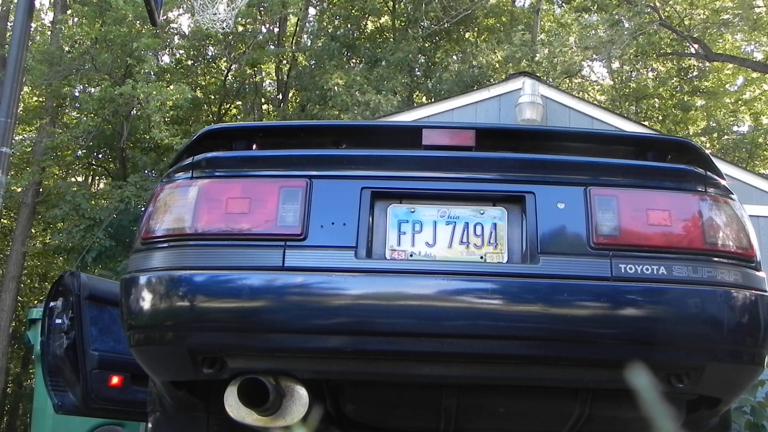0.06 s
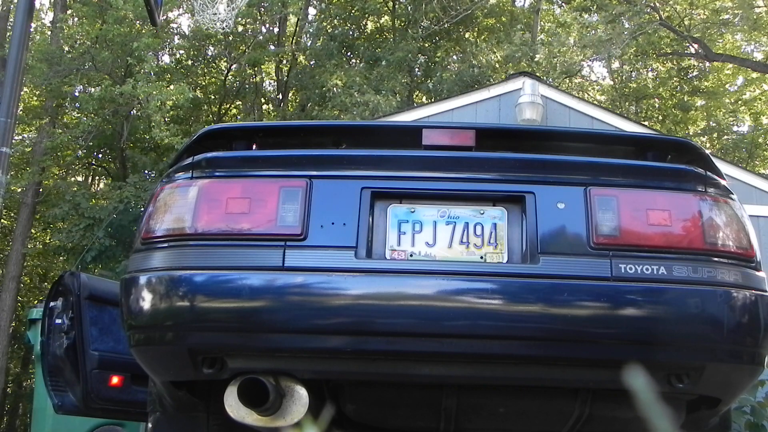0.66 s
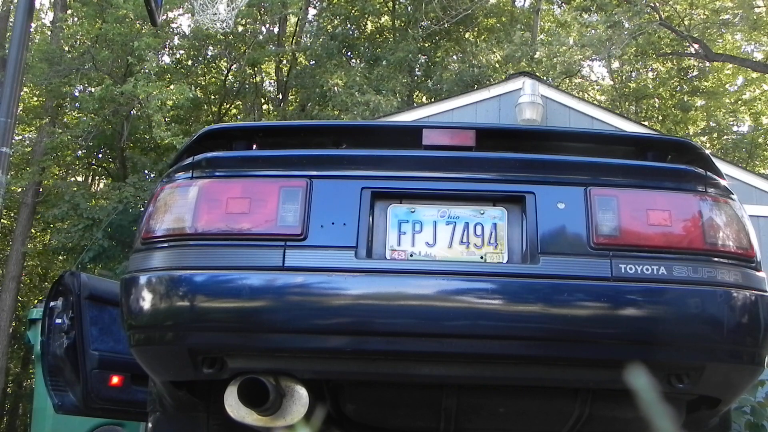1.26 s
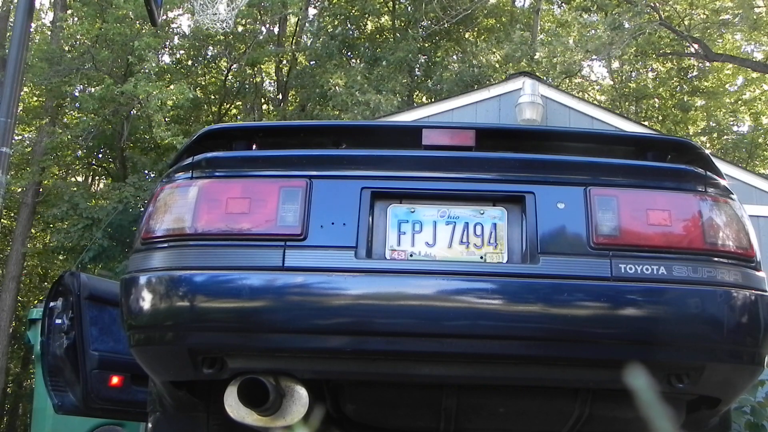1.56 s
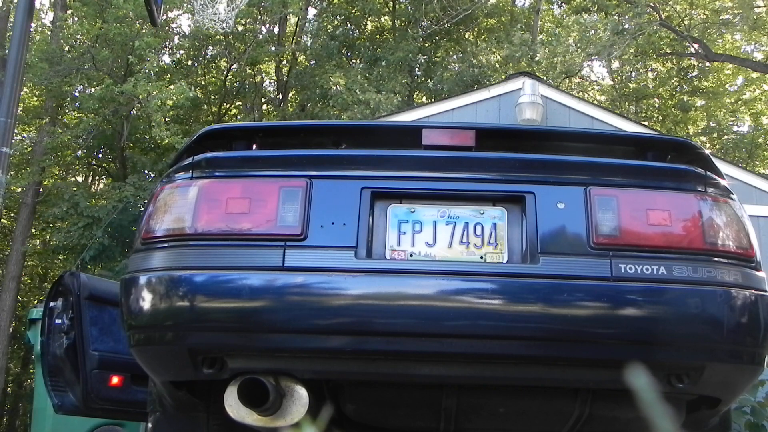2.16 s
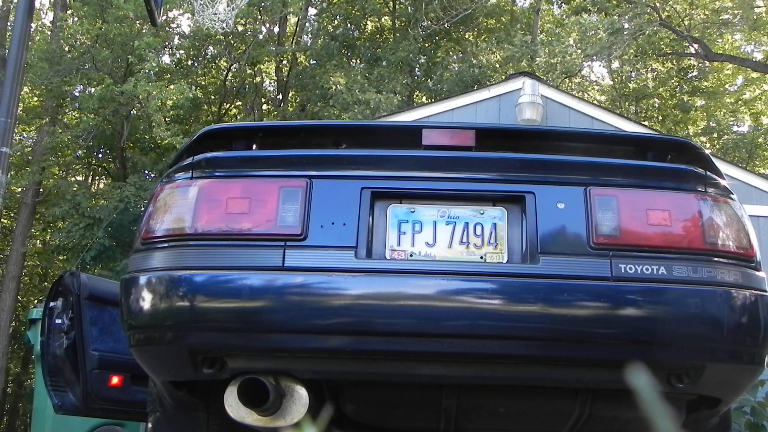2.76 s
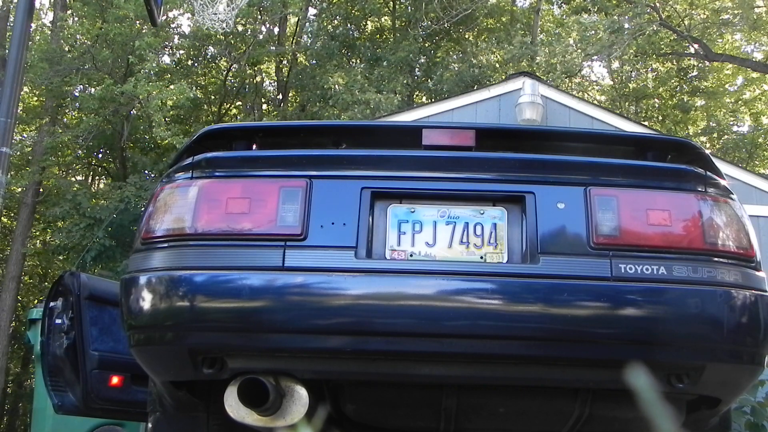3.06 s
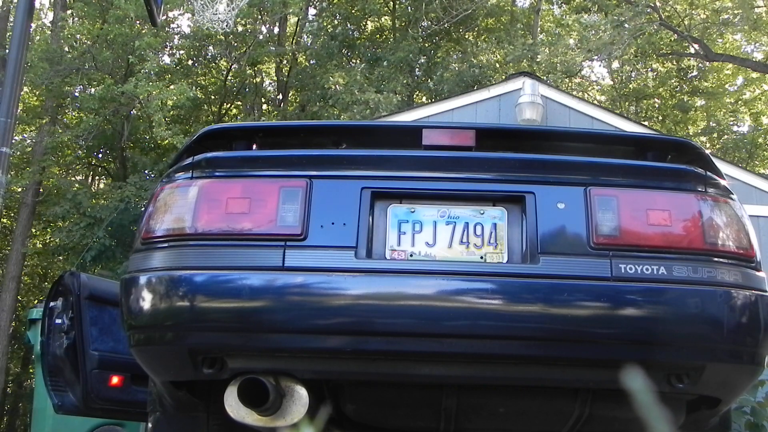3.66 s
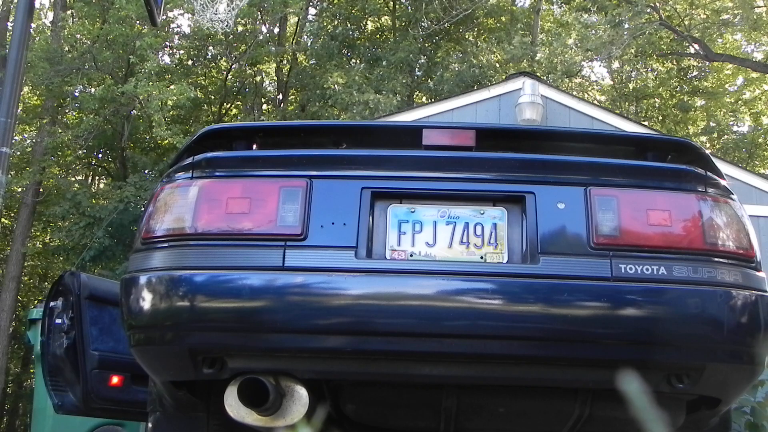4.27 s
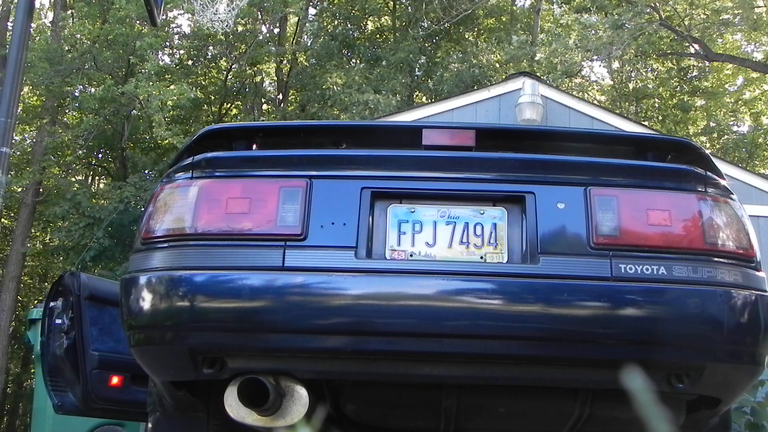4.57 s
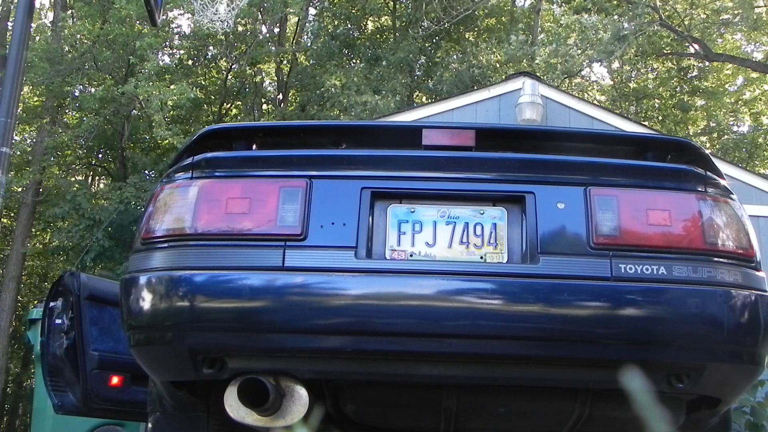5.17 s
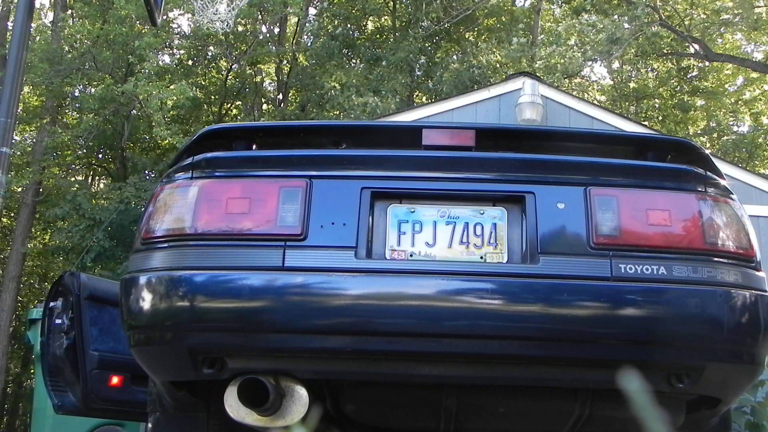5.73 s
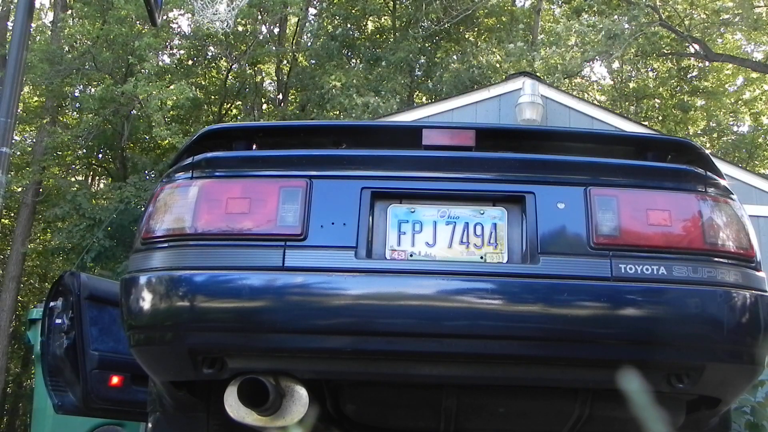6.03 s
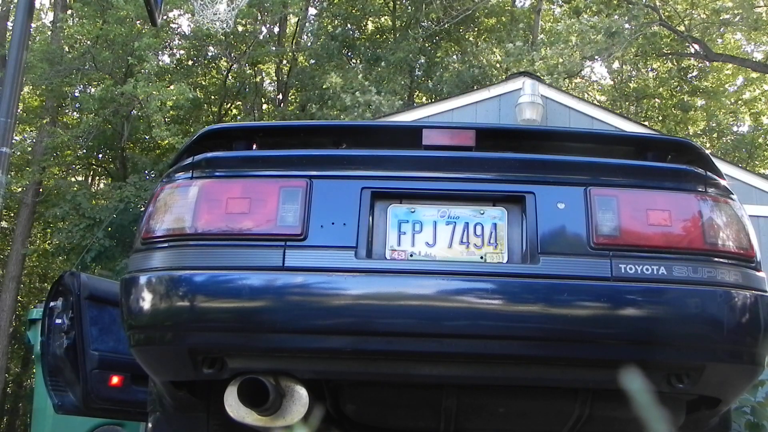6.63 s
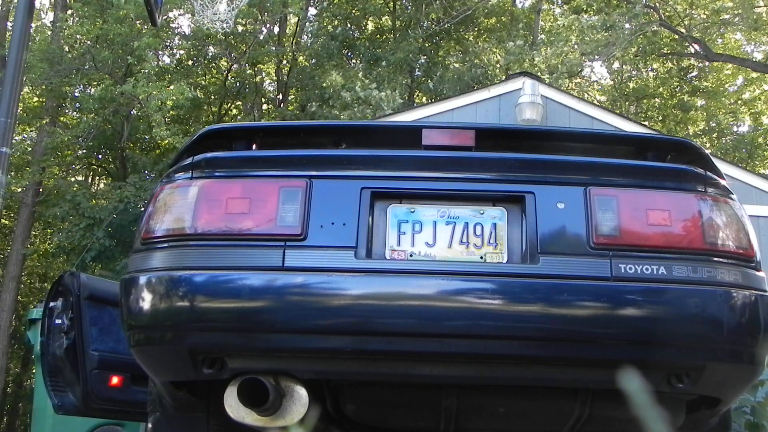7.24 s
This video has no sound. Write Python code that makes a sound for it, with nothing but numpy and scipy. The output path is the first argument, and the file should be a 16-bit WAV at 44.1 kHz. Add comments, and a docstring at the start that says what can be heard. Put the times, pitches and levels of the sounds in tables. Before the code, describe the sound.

Close behind a tailpipe outdoors, a turbocharged engine goes from a low idle into three rising, booming revs with faint hiss and clicks.

```python
"""Six-cylinder car, idling and revved

Heard outdoors from just behind the tailpipe, the engine idles and is revved three times. Each firing
is a pressure pulse that excites resonances: a thump in the muffler, a bark in the pipe. On the overrun
uneven burns lope and pop. Farther off to the right the engine bay whirs and hisses, and boost escapes
in a whoosh after each lift. Faint dry clicks crackle on the bass thumps as a rev begins."""
import sys
import numpy as np
from scipy import signal
from scipy.fft import rfft, irfft, next_fast_len
from scipy.io import wavfile
from scipy.ndimage import uniform_filter1d, minimum_filter1d, map_coordinates

SR = 44100
rng = np.random.default_rng(int(sys.argv[2]) if len(sys.argv) > 2 else 0)


def put_to_file(sound):
    """Save the sound as 16-bit audio at rate SR, in the file named by the first command-line argument."""
    columns = np.atleast_2d(sound).T  # one column per channel
    safe = np.clip(columns, -1, 1)
    whole_steps = np.round(safe * 32767)
    wavfile.write(sys.argv[1], SR, whole_steps.astype(np.int16))


N = 330750

# engine speed: t/s, firing rate/Hz
FIRING_RATE = [(0.0, 35.5), (0.81, 35.87), (0.98, 38.48), (1.0, 39), (1.15, 64.4), (1.23, 80.36),
               (1.33, 99.7), (1.46, 122.4), (1.52, 128.6), (1.84, 106.5), (2.19, 82.45), (2.59, 59.44),
               (2.8, 48.52), (3.34, 40.6), (3.59, 40.8), (3.7, 43.9), (3.78, 51.5), (3.91, 76.8),
               (3.97, 90.16), (4.07, 109.9), (4.26, 148.6), (4.41, 177.4), (4.58, 200.9), (4.78, 185.2),
               (5.35, 138.6), (5.91, 98.6), (6.14, 115), (6.43, 158.4), (6.73, 209.7), (7.02, 266),
               (7.16, 284.5), (7.5, 250.7)]
# throttle presses: opens/s, closes/s, blow-off rasp/dB, whoosh/dB, lift to whoosh peak/s
PRESSES = [(0.979, 1.518, -43, -63.5, 0.13), (3.643, 4.57, -35, -51, .28), (5.924, 7.176, -37.5, -43, .14)]
# cylinders in firing order, at full imbalance: excess strength/1, lag/firing intervals
FIRING_ORDER = [(0.7,0.091),(-0.34,0.029),(0.089,-0.16),(0.79,0.048),(0.39,-0.014),(-.6,-0.26)]
# engine stumbles: t/s, drop in the boom/dB, half-length/s
DROPOUTS = [(0.114, 6, 0.016), (0.192, 10.5, 0.016), (1.526, 4.5, 0.07), (2.882, 7, 0.045), (3.207, 8, .04),
            (3.5, 6, 0.18), (4.322, 1, 0.045), (4.567, 6, 0.05), (5.906, 8, .026), (6.409, 1, 0.034),
            (6.685, 2, 0.034), (7.184, 5.5, 0.031)]
# exhaust responses to even firings, their irregularities, pulse fronts and load: f/Hz, gain/dB
MUFFLER_GAIN = [(20,-59.5),(36,-17.5),(44,-7),(52,5.5),(72,3.5),(108,9.5),(142,6.5),(178,-6),(215,-11.5),(245,-20),(285,-26),(330,-40.5),(500,-71.5),(1200,-105),(5000,-165)]
LOPE_GAIN = [(30,-47.5),(50,-15),(72,4.5),(100,0.5),(135,9),(170,-1),(230,-12),(300,-26),(600,-67),(4000,-160)]
PIPE_GAIN = [(40,-75.5),(130,-29),(225,1.5),(310,-3.5),(390,3),(480,0),(560,-3),(680,-4.5),(800,-12.5),(1000,-19),(1600,-22.5),(2500,-46.5),(8000,-86)]
CRACK_GAIN = [(300,-56),(650,-8.5),(850,-3),(1100,-2.5),(1600,-4.5),(2200,-21.5),(3200,-28),(7000,-80)]
# base levels of exhaust bark and engine bay whir: firing rate/Hz, level/dB
BARK_BY_RATE = [(35, -33), (48, -35), (100, -31), (150, -29), (195, -25), (235, -22.5), (290, -27)]
WHIR_BY_RATE = [(35, -37.5), (43, -38.5), (56, -42), (80, -39.5), (135, -38.5), (195, -32.5), (290, -30)]
# noise of outflow, machinery, intake (hiss, top fizz), turbo and blow-off: f/Hz, level/dB
BUFFET_SPECTRUM = [(15, -7), (30, -2.5), (60, -2.5), (120, -15), (400, -59.5)]
WHIR_SPECTRUM = [(400,-40.5),(700,2),(900,0.5),(1200,0),(1600,-1),(2400,-5.5),(3200,-10),(3800,-14.5),(4200,-22.5),(6000,-32.5),(10000,-87)]
HISS_SPECTRUM = [(2500,-23),(3850,1),(4400,-2),(4650,0),(4950,-2),(5260,-2),(5950,-4.5),(6350,-4),(7500,-6.5),(7730,-5.5),(8150,-8.5),(8600,-10),(9500,-12.5),(12500,-40)]
FIZZ_SPECTRUM = [(6000,-24.5),(9000,0.5),(11000,1),(13000,-3.5),(15500,3.5)]
TURBO_SPECTRUM = [(3000,-30.5),(4200,-4),(5500,-1.5),(6300,3.5),(7000,-3.5),(7450,-2.5),(8500,-7.5),(9500,-14),(12000,-45)]
RASP_SPECTRUM = [(600, -24.5), (1400, -4), (2300, -1), (3400, -10), (4500, -18), (8000, -44.5)]
# the clearest dry clicks: t/s, level before filtering/dB
CLICK_EVENTS = [(0.5666, -37.5), (0.9502, -37.5), (1.0028, -37), (1.0497, -38), (1.1065, -42), (1.14, -38),
                (1.1982, -38), (3.6626, -38), (3.7079, -41), (3.7494, -37), (3.7918, -35.5),
                (3.8385, -32.5), (3.8844, -42), (4.79, -37.5), (5.031, -39), (5.3073, -34.5),
                (6.0114, -38.5), (6.3246, -38)]
# colour of a click: f/Hz, gain/dB
CLICK_GAIN = [(2000,-23.5),(5000,-9.5),(9000,6.5),(15000,3.5)]
# extra-strong burns: t/s, pulse level/dB
STRONG_BURNS = [(1.55,-12.5),(2.96,-11),(3.092,-16.5),(3.136,-16.5),(3.277,-17),(3.663,-20.5),(4.612,-6),(7.422,-11.5),(7.434,-17),(7.459,-6.5)]
# left-right likeness of airy sounds: f/Hz, coherence/1
COHERENCE = [(200,0.78),(400,0.82),(700,0.61),(1400,0.12),(2800,.55),(5500,0.31),(10000,.4),(14000,0.38)]
# microphone pair: f/Hz, left minus right level/dB, phase lead of the left/rad
MIC_DIFFERENCES = [(60,.9,-.22),(110,.5,-.22),(200,.4,-.36),(380,-2.2,-1.15),(700,-6,-1.3),(1300,-9,-2.7),(2300,-8.5,-4.2),(4400,-3.5,-5),(8000,-.7,-5.8),(15000,.6,-6.2)]

PEDAL_S, SETTLE_S = 0.064, 0.18  # lag of the throttle; further lag of the ducking and the gulp's decay
IDLE_HZ, IDLE_WIDTH_HZ = 49, 3  # below this firing rate the idle valve feeds the engine
LABOUR_HZ, LABOUR_WIDTH_HZ = 74, 39.5  # where an open throttle strains the engine most
HUNT_HZ, HUNT_WIDTH_HZ, HUNT_SCATTER = 43.9, 5, .17  # ragged burns as the engine hunts for its idle
IMBALANCE, SCATTER = (.04, 0.21, 0.025), (.035, 0.05, 0.14)  # base, extra on overrun, extra at idle
BOOM_DB, BOOM_HZ, ABOVE_DB_PER_OCT, BELOW_DB_PER_OCT = -10, 130.4, 13.5, 4
STEEPNESS_S, STEEPNESS_LOAD_S, FULL_PULL_HZ = .00022, 0.0012, 100
BARK_LABOUR_DB, BARK_GULP_DB, CRACK_DB = 5, 2.5, -6.5
BUFFET_DB, BUFFET_FADES_HZ = -43.5, 145
INTAKE_DB, FIZZ_DB = (-57.5, 6, 3), (-64.5, 4.5, 17.5)  # coasting, gain at idle, depth of ducking
TURBO_DB, TURBO_HZ, TURBO_DB_PER_OCT = -49.5, 280, 21
DIP_HZ, DIP_WIDTH_HZ, DIP_DB = 137, 17, 3  # the treble dips as the engine pulls through this rate
TOP_HZ = 15850


def amp(db):
    """Amplitude ratio of a level in decibels."""
    return 10 ** (np.asarray(db) / 20)


def unit(x):
    """Normalisation to rms 1."""
    return x / np.sqrt(np.mean(x ** 2) + 1e-20)


def along(points, hz):
    """Interpolation on a logarithmic frequency axis."""
    f, values = np.transpose(points)
    return np.interp(np.log(hz + 1), np.log(f + 1), values)


def wobble(rate):
    """Random modulation: a spline with rate knots a second."""
    return map_coordinates(rng.standard_normal(int(N * rate / SR) + 4), [np.arange(N) * rate / SR])


def lagged(x, seconds):
    """First-order relaxation towards x."""
    keep = np.exp(-1 / (seconds * SR))
    return signal.lfilter([1 - keep], [1, -keep], x)


def filtered(x, response):
    """Linear filtering: the spectrum times a frequency response."""
    size = 2 * next_fast_len((N + SR // 2) // 2)
    return irfft(rfft(x, size) * response(np.fft.rfftfreq(size, 1 / SR)), size)[..., :N]


def ring(x, colour, abrupt=1):
    """Resonance: at abrupt 1 (minimum phase) ringing follows each push; at less it also swells into it."""
    def response(hz):
        cepstrum = irfft(np.log(amp(along(colour, hz))))
        half = len(cepstrum) // 2
        cepstrum[1:half] *= 2
        cepstrum[half + 1:] = 0
        log_gain = rfft(cepstrum)
        return np.exp(log_gain.real + 1j * abrupt * log_gain.imag)
    return filtered(x, response)


def steady(x):
    """Running normalisation to rms 1 over an eighth of a second."""
    window = np.hanning(SR // 8)
    weight = signal.fftconvolve(np.ones(N), window, "same")
    return x / np.sqrt(np.abs(signal.fftconvolve(x ** 2, window, "same")) / weight + 1e-20)


def pulses(at, sizes):
    """Impulse train at fractional sample positions."""
    at = np.clip(at, 0, N - 2)
    whole = at.astype(int)
    return np.bincount(whole, sizes * (1 - at + whole), N) + np.bincount(whole + 1, sizes * (at - whole), N)


def rush(colour):
    """Partial coherence: independent mid and side noises make stereo noise of rms 1."""
    def response(hz):
        angle = np.arccos(np.clip(along(COHERENCE, hz), -1, 1)) / 2
        return amp(along(colour, hz)) * [np.cos(angle), np.sin(angle)]
    mid, side = filtered(rng.standard_normal((2, N)), response)
    return unit(np.array([mid + side, mid - side]))


def driving():
    """Operating point: firing rate/Hz, then throttle, idling and labour, each 0-1."""
    t = np.arange(N) / SR
    rate = np.interp(t, *np.transpose(FIRING_RATE))
    pedal = sum(1. * ((t > opens) & (t < closes)) for opens, closes, *_ in PRESSES)
    throttle = lagged(pedal, PEDAL_S)
    idling = .5 - .5 * np.tanh((rate - IDLE_HZ) / IDLE_WIDTH_HZ)
    labour = throttle * np.exp(-((rate - LABOUR_HZ) / LABOUR_WIDTH_HZ) ** 2)
    return rate, throttle, idling, labour


def gulping(throttle):
    """Transient inflow just after the throttle opens, 0-1."""
    return throttle * (1 - lagged(throttle, SETTLE_S))


def combustion(drive):
    """Cyclic variation: fed burns are even and clean, starved ones ragged."""
    rate, throttle, idling, _ = drive
    state = [np.ones(N), (1 - throttle) * (1 - idling), idling]
    hunting = (1 - throttle) * np.exp(-((rate - HUNT_HZ) / HUNT_WIDTH_HZ) ** 2)
    imbalance = np.dot(IMBALANCE, state)
    scatter = np.dot(SCATTER, state) + HUNT_SCATTER * hunting
    turbulence = np.maximum(1 - 0.3 * throttle - 0.0026 * rate, .11)  # noisy share of the bark
    return np.clip([imbalance, scatter, turbulence], 0, 1)


def firings(cycles, drive):
    """Superposition: firing positions, an even pulse train, and what unequal burns add to it."""
    imbalance, scatter, _ = combustion(drive)
    number = np.arange(1, int(cycles[-1]))
    at = np.interp(number, cycles, np.arange(N))
    now = at.astype(int)
    chance = rng.standard_normal((len(at), 2))
    excess, lag = np.array(FIRING_ORDER)[number % len(FIRING_ORDER)].T
    # an odd burn also leaves the valve a little early or late
    late = (imbalance[now] * lag + 0.23 * scatter[now] * chance[:, 0]) * np.gradient(at)
    sizes = (1 + imbalance[now] * excess) * np.exp(scatter[now] * chance[:, 1])
    even = pulses(at, np.ones(len(at)))
    return at, even, pulses(at + late, sizes) - even


def muffler(even, uneven, drive):
    """Acoustic low-pass: the low orders boom, and the cylinders' differences lope between them."""
    rate, throttle, idling, _ = drive
    octaves = np.log2(rate / BOOM_HZ)
    above_db = ABOVE_DB_PER_OCT * np.maximum(octaves, 0)
    below_db = BELOW_DB_PER_OCT * np.maximum(-octaves, 0) * (1 - throttle)
    boom_db = BOOM_DB + 0.03 * throttle + 2.8 * idling - above_db - below_db - stumbles()
    boom = -ring(even, MUFFLER_GAIN, abrupt=0.83) - ring(uneven, LOPE_GAIN, abrupt=0.8)
    # load steepens each pulse, which lifts its overtones
    steepness_s = STEEPNESS_S + STEEPNESS_LOAD_S * throttle * np.minimum(rate / FULL_PULL_HZ, 1) ** 3
    return amp(boom_db) * steady(boom + steepness_s * SR * np.gradient(boom))


def tailpipe(at, cycles, drive):
    """Pipe resonance: each pulse front barks, cracks under load and drags a turbulent puff after it."""
    rate, throttle, _, labour = drive
    imbalance, _, turbulence = combustion(drive)
    bark_db = along(BARK_BY_RATE, rate) + 0.22 * throttle + BARK_LABOUR_DB * labour
    bark_db += BARK_GULP_DB * gulping(throttle) - .15 * stumbles()
    turbulence = turbulence * np.clip(1 - .4 * labour, 0, 1)
    excess, lag = np.array(FIRING_ORDER)[np.arange(1, len(at) + 1) % len(FIRING_ORDER)].T
    chance = rng.standard_normal((len(at), 2))
    sizes = 1 + (0.61 + 5.0 * np.interp(at, np.arange(N), imbalance)) * excess
    # unequal manifold runners shift the fronts, so lines sound between the firing orders
    arrival = at + 0.0015 * SR * lag
    bark = steady(-ring(pulses(arrival, sizes * amp(.9 * chance[:, 0])), PIPE_GAIN))
    puffs = unit(np.exp(0.081 * np.cos(2 * np.pi * (cycles - .15)))) * rush(PIPE_GAIN)
    crack = steady(-ring(pulses(arrival, amp(2.8 * chance[:, 1])), CRACK_GAIN))
    tone = np.sqrt(1 - turbulence) * bark + np.sqrt(turbulence) * puffs
    return amp(bark_db) * (tone + amp(CRACK_DB) * labour ** 2 * crack)


def buffeting(rate):
    """Unsteady outflow: gas rumbles out of the tailpipe and smooths out at high firing rates."""
    return amp(BUFFET_DB) / np.hypot(1, (rate / BUFFET_FADES_HZ) ** 5) * rush(BUFFET_SPECTRUM)


def whir(cycles, rate, ducking, labour):
    """Amplitude modulation: the noise of valve gear, belts and fan pulses with the shaft."""
    waver = amp(.6 * wobble(7))
    phase = 2 * np.pi * cycles
    clatter = amp(0.8 * np.cos(phase) + 0.36 * np.cos(phase / len(FIRING_ORDER)) + 0.99 * wobble(45))
    level_db = along(WHIR_BY_RATE, rate) - 3.6 * ducking + 1.4 * labour
    return amp(level_db) * waver * unit(clatter) * rush(WHIR_SPECTRUM)


def intake_gain(drive, ducking, coasting_db, idle_db, duck_db):
    """Envelope of flow noise: hiss and fizz duck while the throttle is open, then recover."""
    rate, throttle, idling, _ = drive
    bypass = idling * (rate.min() / rate) ** 2  # the idle valve opens wider the slower the engine turns
    return amp(coasting_db + idle_db * bypass - duck_db * ducking + 6 * gulping(throttle))


def engine_bay(cycles, drive):
    """Incoherent sources add in power: whir, intake, blow-off and a turbo that swells with speed."""
    rate, throttle, _, labour = drive
    ducking = lagged(throttle, SETTLE_S)  # 0-1, builds while the throttle is open and the exhaust booms
    machinery = whir(cycles, rate, ducking, labour)
    turbo = amp(TURBO_DB + TURBO_DB_PER_OCT * np.log2(rate / TURBO_HZ))
    rasp, whoosh = blow_off()
    flicker = amp(wobble(60))
    intake = intake_gain(drive, ducking, *INTAKE_DB) * rush(HISS_SPECTRUM)
    boost = np.hypot(turbo, whoosh) * rush(TURBO_SPECTRUM)
    front = underbody(machinery + flicker * (intake + boost) + rasp * rush(RASP_SPECTRUM), echo=0.14)
    fizz = intake_gain(drive, ducking, *FIZZ_DB) + amp(-15.5) * turbo + amp(-10.0) * whoosh
    dip = amp(-DIP_DB * ducking * np.exp(-((rate - DIP_HZ) / DIP_WIDTH_HZ) ** 2))
    return dip * (front + fizz * rush(FIZZ_SPECTRUM))


def underbody(x, echo, count=8):
    """Comb filtering: reflections between road and floor pan ripple the spectrum."""
    out = x.copy()
    for delay_s, strength in rng.uniform([.001, -echo], [.016, echo], (count, 2)):
        lag = round(delay_s * SR)
        out[:, lag:] += strength * x[:, :N - lag]
    return out * np.std(x) / np.std(out)


def stumbles():
    """Gaussian dips in level, in dB, where the engine stumbles."""
    t = np.arange(N) / SR
    return sum(db * np.exp(-((t - s) / half_s) ** 2) for s, db, half_s in DROPOUTS)


def clicks(drive):
    """Broadband transients: faint dry clicks, crackling on the loudest bass thumps as a rev begins."""
    rate, throttle, _, _ = drive
    clicks_per_s = 220 * throttle * np.clip((LABOUR_HZ - rate) / (LABOUR_HZ - IDLE_HZ), 0, 1)
    onsets = np.flatnonzero(rng.random(N) < clicks_per_s / SR)
    crackle = [(i / SR, rng.normal(-44, 3)) for i in onsets]
    out, t = np.zeros(N + SR), np.arange(SR // 100) / SR
    for s, db in list(CLICK_EVENTS) + crackle:
        burst = rng.standard_normal(len(t)) * amp(-60 * t / .004)
        out[round(s * SR):][:len(t)] += amp(db) * burst / np.abs(burst).max()
    return ring(out[:N], CLICK_GAIN)


def blow_off():
    """Pressure release: envelopes of a rasp, then a thinner whoosh, as boost escapes after each lift."""
    t = np.arange(N) / SR
    rasp, whoosh = np.zeros(N), np.zeros(N)
    swell = lambda age: (age * np.exp(1 - age)) ** 1.6
    for _, closes, rasp_db, whoosh_db, peak_s in PRESSES:
        age = np.maximum(t - closes, 0) / peak_s
        rasp += amp(rasp_db) * swell(1.55 * age)
        whoosh += amp(whoosh_db) * swell(age)
    return rasp, whoosh


def pops(at):
    """Impulse response: extra-strong burns ride on the nearest firing and thump muffler and pipe."""
    s, db = np.transpose(STRONG_BURNS)
    nearest = at[np.abs(at[:, None] - s * SR).argmin(axis=0)]
    pushes = pulses(nearest, amp(db))
    thump = -ring(pushes, LOPE_GAIN, abrupt=0.86) - amp(-27.5) * ring(pushes, PIPE_GAIN)
    return thump * amp(db.max()) / np.abs(thump).max()


def microphones(hz):
    """Level and phase differences: the middle range reaches the right sooner and more strongly."""
    pair = np.array(MIC_DIFFERENCES)
    lean, lead = amp(along(pair[:, :2], hz)), along(pair[:, ::2], hz)
    left = np.sqrt(lean) * np.exp(.5j * lead)
    centre_power = (lean + 1 / lean + 2 * np.clip(along(COHERENCE, hz), 0, 1) * np.cos(lead)) / 4
    return np.array([left, 1 / left]) / np.sqrt(centre_power)


def scene():
    """Superposition of the sources, timed by one shaft, and the clicks."""
    drive = driving()
    rate = drive[0]
    cycles = np.cumsum(rate) / SR  # one per firing
    at, even, uneven = firings(cycles, drive)
    exhaust = muffler(even, uneven, drive) + tailpipe(at, cycles, drive) + buffeting(rate)
    mix = exhaust + engine_bay(cycles, drive) + clicks(drive) + pops(at)
    return filtered(mix, microphones)


def record(dry):
    """Peak and band limiting: everything ducks under the loudest thumps and is cut off at TOP_HZ."""
    needed = np.minimum(1, .9 / (np.abs(dry).max(axis=0) + 1e-9))
    hold = SR // 50
    gain = uniform_filter1d(minimum_filter1d(needed, 2 * hold), hold)
    return filtered(dry * gain, lambda hz: hz < TOP_HZ)


dry = scene()
out = record(dry)
put_to_file(out)
```